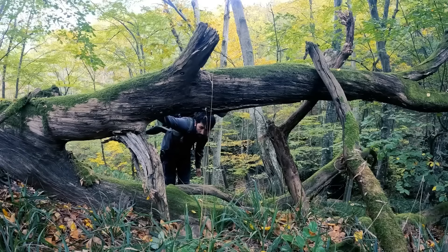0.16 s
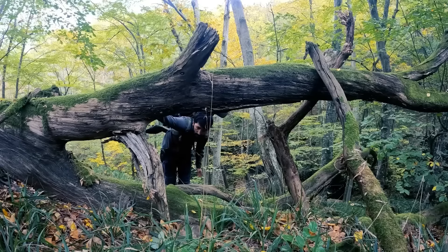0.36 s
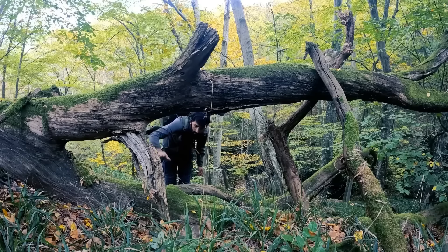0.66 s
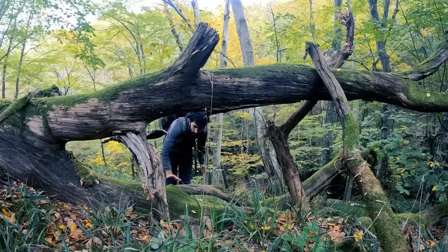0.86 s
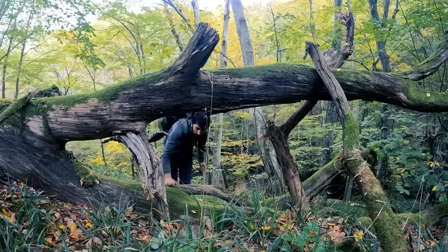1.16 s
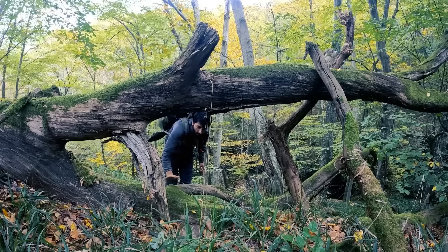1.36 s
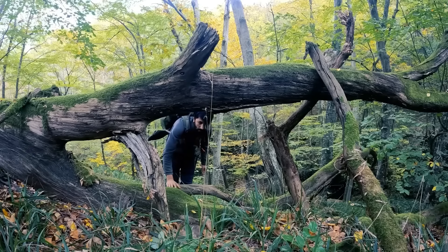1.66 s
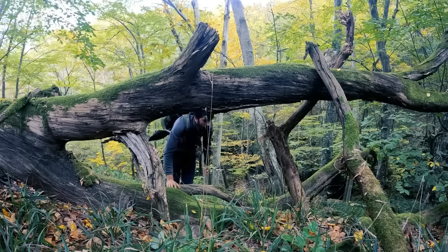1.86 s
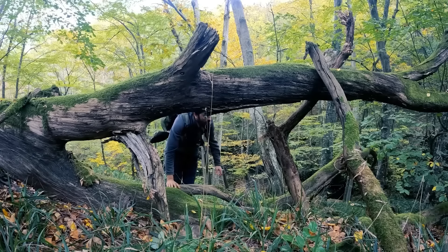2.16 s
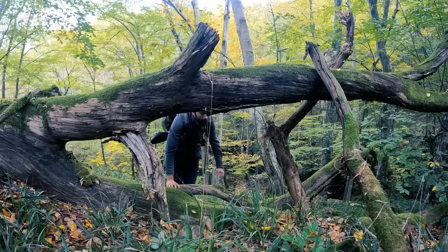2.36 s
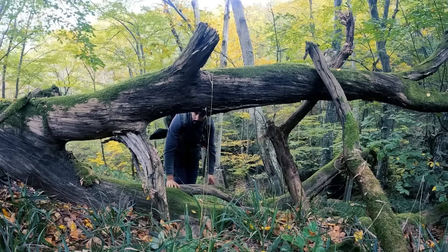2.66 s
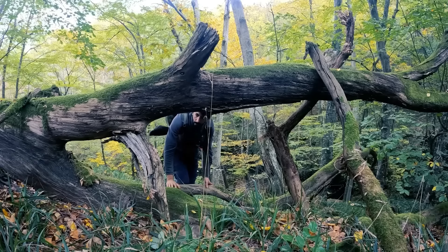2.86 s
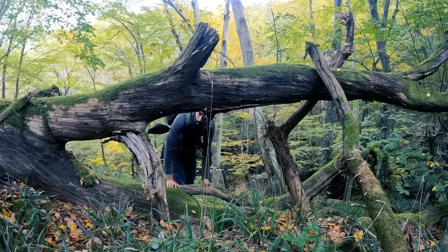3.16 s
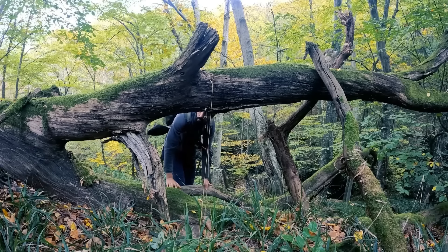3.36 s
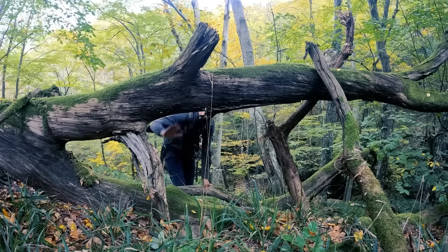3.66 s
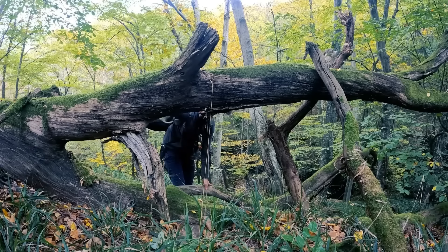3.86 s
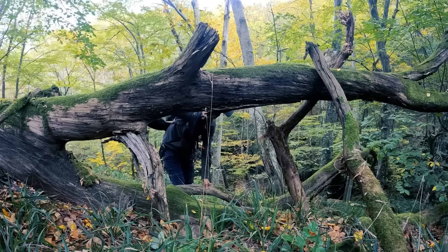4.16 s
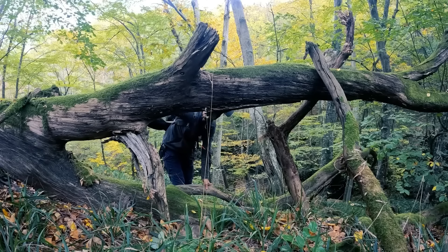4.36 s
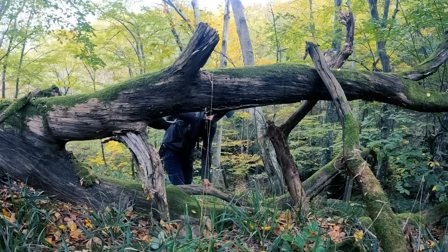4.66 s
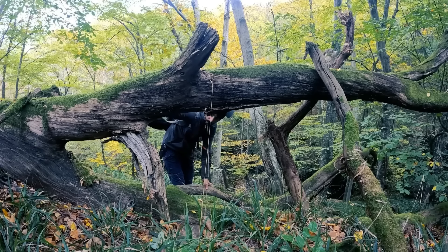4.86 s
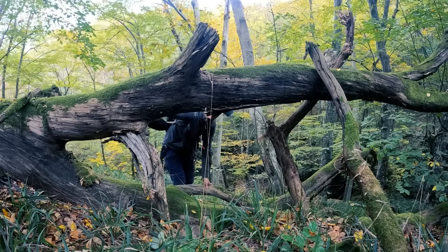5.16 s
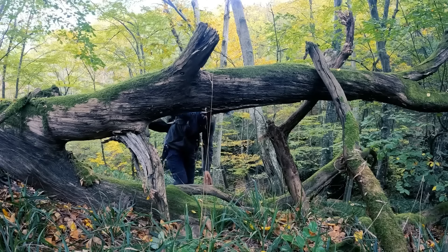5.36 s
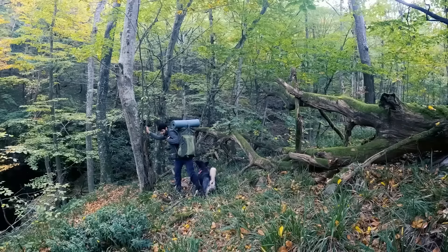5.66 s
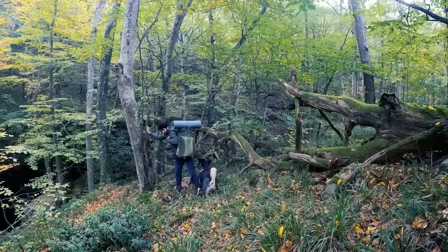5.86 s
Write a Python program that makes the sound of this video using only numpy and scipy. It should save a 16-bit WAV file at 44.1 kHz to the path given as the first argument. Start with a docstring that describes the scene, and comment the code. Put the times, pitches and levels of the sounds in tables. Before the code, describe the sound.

Over a very soft hush of foliage and a faint low murmur come three quick knocks on a log, then rustling leaves, soft footfalls and snapping twigs. Four evenly spaced hand thumps strike a large trunk, hollow and barky with low, quickly fading timber resonance. Finally leaves crunch and small twigs tick as he walks away. Outdoor stereo, close and dry with short woodland tails.

```python
"""In a quiet wood, a hiker slaps a low log three times, then thumps a big fallen trunk four times.
Each blow is a short clack of bark, made by impulses and noise through resonances, then the dull ring
of the timber, a sum of delayed decaying modes; noise tails stand for the trees that scatter the clack.
Around the blows he shifts in dry leaves and twigs snap, then he walks off, as shaped bursts of noise,
over a hush of foliage and a low murmur, both of filtered noise."""
import sys
import numpy as np
from scipy import signal
from scipy.fft import rfft, irfft, next_fast_len
from scipy.io import wavfile
from scipy.ndimage import uniform_filter1d, map_coordinates

SR = 44100
rng = np.random.default_rng(int(sys.argv[2]) if len(sys.argv) > 2 else 0)


def generate_wav(sig):
    """Save sig (samples, or channels by samples) to the path in sys.argv[1] as 16-bit PCM at SR."""
    pcm = np.round(np.clip(np.atleast_2d(sig).T, -1, 1) * 32767).astype(np.int16)
    wavfile.write(sys.argv[1], SR, pcm)


N = 264600  # samples: six seconds


def amp(db):
    """Logarithmic level: decibels become a pressure gain."""
    return 10 ** (np.asarray(db) / 20)


def unit(x):
    """Normalisation: a signal scaled to rms 1."""
    return x / np.sqrt(np.mean(x ** 2) + 1e-20)


def along(points, hz):
    """Logarithmic pitch scale: interpolates (frequency, value) points on a log axis."""
    f, v = np.transpose(points)
    return np.interp(np.log(hz + 1), np.log(f + 1), v)


def wobble(rate_hz):
    """Slow fluctuation: a smooth random curve with rate_hz knots a second."""
    knots = rng.standard_normal(int(N * rate_hz / SR) + 4)
    return map_coordinates(knots, [np.arange(N) * rate_hz / SR])


def filtered(x, response):
    """Linear filtering: the spectrum is multiplied by a complex response of frequency."""
    n = x.shape[-1]
    m = next_fast_len(n + SR // 4)
    hz = np.fft.rfftfreq(m, 1 / SR)
    return irfft(rfft(x, m) * response(hz), m)[..., :n]


def bell(hz, centre_hz, octaves):
    """Band limitation: a Gaussian pass band on the octave scale."""
    return np.exp(-.5 * (np.log2((hz + 1) / centre_hz) / octaves) ** 2)


def resonance(hz, centre_hz, width_hz):
    """Damped resonance: the complex response of one mode, 1 at its centre."""
    damping = 1j * hz * width_hz
    return damping / (centre_hz ** 2 - hz ** 2 + damping)


def event_time():
    """Causal time base: the axis of one event in seconds, with a short run-up before zero."""
    return np.arange(-SR // 50, SR * 3 // 4) / SR


def add(track, start_s, sound):
    """Superposition: mixes an event into a track with its zero at start_s."""
    start = round((start_s + event_time()[0]) * SR)
    part = sound[..., :N - start]
    track[..., start:start + part.shape[-1]] += part


def burst(t, rise, t60):
    """Exponential growth and decay: 60 dB up in rise seconds to time zero, 60 dB down in t60."""
    return amp(-60 * np.maximum(-t / rise, t / t60))


def swells(moves, attack_s, release_s):
    """Energy summation: (start_s, level_db, hold_s) swells combine as the root of summed squares."""
    t = np.arange(N) / SR
    gains = []
    for start_s, level_db, hold_s in moves:
        outside_hold = t - np.clip(t, start_s, start_s + hold_s)
        gains.append(amp(level_db) * burst(outside_hold, attack_s, release_s))
    return np.linalg.norm(gains, axis=0)


# Interchannel correlation of diffuse sound: pitch_hz, left_right_likeness (1 = identical)
DIFFUSE_CORRELATION = [(60, 1), (150, 0.18), (380, 0.52), (950, 0.81), (2380, 0.51), (5980, 0.74),
                       (15000, 0.14)]


def rush(spectrum, patchy_db):
    """Diffuse field: partly correlated stereo noise of rms 1 with patches of random gain."""
    z = signal.stft(rng.standard_normal((2, N)), nperseg=512)[2]
    field = uniform_filter1d(rng.standard_normal(z.shape[1:]), size=6, axis=0)
    field = uniform_filter1d(field, size=14, axis=1)
    pair = signal.istft(z * amp(patchy_db * unit(field)), nperseg=512)[1][:, :N]

    def mid_side_response(hz):
        # this angle between mid and side gives the wanted correlation
        angle = np.arccos(np.clip(along(DIFFUSE_CORRELATION, hz), -1, 1)) / 2
        return amp(along(spectrum, hz)) * [np.cos(angle), np.sin(angle)]

    mid, side = filtered(pair, mid_side_response)
    return unit(np.array([mid + side, mid - side]))


# Spectrum of the far foliage: pitch_hz, relative_level_db (per Hz)
FOLIAGE_SPECTRUM = [(410, -25.5), (700, -18), (806, -11.5), (1020, -1.5), (1100, -2), (1230, 0.5),
                    (1630, -1), (1810, -1.5), (4210, -5), (5310, -12.5), (5810, -8.5), (7220, -5),
                    (10200, -20), (12100, -18.5), (15000, -45)]
# Spectrum of the low murmur of the valley: pitch_hz, relative_level_db (per Hz)
MURMUR_SPECTRUM = [(12, -45), (20, -6), (65, -9), (84, -10), (108, -31), (140, -2), (185, -2.5), (229, -3),
                   (370, -12.5), (718, -11), (800, -13), (1040, -23), (1760, -120)]


def background():
    """Broadband noise: a gently wavering hush of foliage lies over faint low air noise."""
    hush = amp(-56 + 1.32 * wobble(2.58)) * rush(FOLIAGE_SPECTRUM, patchy_db=0.5)
    murmur = amp(-66 + .5 * wobble(4)) * rush(MURMUR_SPECTRUM, patchy_db=.8)
    return hush + murmur


# Spectrum of the rustling leaves: pitch_hz, relative_level_db (per Hz)
LEAF_SPECTRUM = [(300, -10.5), (700, -6.5), (1300, 0), (3000, -1.5), (5000, -8), (7000, -2), (9000, -11.5),
                 (12500, -16), (15000, -32)]
# Gentler rustles of the leaves, the last four being strides as he walks off: start_s, level_db, hold_s
LEAF_RUSTLES = [(.45, -60, 1.0), (2.35, -62.5, 1.58), (5.28, -57.5, .2), (5.57, -49.5, .11),
                (5.83, -51.5, 0.018), (5.95, -51, .06)]
# Footsteps on the spot, also played by soil(): start_s, leaves_level_db, soil_level_db
FOOTSTEPS = [(2.72, -55, -64), (3.06, -47.5, -49.5), (3.23, -49.5, -59), (3.41, -60, -66.5)]
STEP_ATTACK_S, STEP_HOLD_S, STEP_RELEASE_S = 0.26, 0.029, 0.22


def leaves():
    """Granular friction: steps, gentler rustles and strides sound the dry leaves in random clumps."""
    steps = [(start_s, level_db, STEP_HOLD_S) for start_s, level_db, _ in FOOTSTEPS]
    crunch = swells(steps, STEP_ATTACK_S, STEP_RELEASE_S)
    rustle = swells(LEAF_RUSTLES, attack_s=0.79, release_s=0.93)
    clumps = unit(amp(1.23 * wobble(250) + 1.45 * wobble(35)))
    left_right = amp([[.6], [-.6]])
    return np.hypot(crunch, rustle) * clumps * rush(LEAF_SPECTRUM, patchy_db=0.6) * left_right


def ring(t, modes):
    """Modal superposition: slow bending waves set the modes of a stem ringing one after another."""
    hz, db, t60, delay = np.transpose(modes)[:, :, None]
    age = np.maximum(t - delay, 0)
    # each blow excites every mode a little differently
    level = db + rng.normal(0, 0.69, hz.shape) - 60 * age / t60
    onset = 1 - np.exp(-age * hz)
    return np.sum(amp(level) * np.sin(2 * np.pi * hz * age) * onset, axis=0)


def bending_wave(t, start_hz, spread_s, db, t60):
    """Dispersion: high notes outrun low ones along the stem, so the returning wave glides down."""
    age = np.maximum(t, 0)
    hz = start_hz / (1 + age / spread_s) ** 2
    envelope = amp(db - 60 * age / t60) * (1 - np.exp(-age / 0.012))
    return envelope * np.sin(2 * np.pi * np.cumsum(hz) / SR)


# Resonances of the wood around the struck spot: pitch_hz, width_hz, relative_level_db
BARK_RESONANCES = [(975, 112, 1.5), (1403, 156, 1.5), (1683, 137, 4), (2180, 187, 3), (2750, 310, -0.5),
                   (3670, 240, 2.5), (4130, 150, -7)]
# Spectrum of the cracking dry flakes: pitch_hz, relative_level_db (per Hz)
CRACK_SPECTRUM = [(1500, -25), (2600, -26), (3600, 0), (4700, -5), (6100, -7), (6800, -8.5), (8500, -15),
                  (12500, -23), (14500, -40)]


def contact(t, pop_db, pop_hz, clack_db, corner_hz, crack_db, crush_t60):
    """Impact excitation: a push amid crushing bark pops hand air, clacks wood and cracks flakes."""
    crush = rng.standard_normal(len(t)) * burst(t, rise=0.013, t60=crush_t60)
    crush /= np.linalg.norm(crush)
    # the heel of the hand lands first, the fingers a moment later
    heel = signal.unit_impulse(len(t), np.argmin(abs(t)))
    fingers = amp(-5.5) * signal.unit_impulse(len(t), np.argmin(abs(t - .0016)))
    push = heel + fingers

    def hollow(f):
        return resonance(f, pop_hz, 0.76 * pop_hz) ** 2

    def soft_wood(f):
        # neighbouring modes alternate in sign
        wood = sum((-1) ** k * amp(db) * resonance(f, hz, width)
                   for k, (hz, width, db) in enumerate(BARK_RESONANCES))
        return wood / np.sqrt(1 + (f / corner_hz) ** 10)

    pop = filtered(amp(-3) * push + amp(-9.5) * crush, hollow)
    clack = filtered(amp(-5.5) * push + amp(-1.5) * crush, soft_wood)
    crack = filtered(amp(-3) * push + amp(-2) * crush, lambda f: amp(along(CRACK_SPECTRUM, f)))
    return amp(pop_db) * pop + amp(clack_db) * clack + amp(crack_db) * crack


# Decay of the scatter among near stems: pitch_hz, t60_s
NEAR_DECAY = [(200, 0.37), (600, 0.13), (1500, 0.042), (4000, 0.15), (10000, 0.18)]


def forest(x, near_db, far_db, far_t60, echo_db, echo_s, echo_hz, width):
    """Scattering: near stems give a short tail, far ones a faint long one, a bank one blurred echo."""
    hz, t, z = signal.stft(rng.standard_normal((2, SR * 3 // 4)), SR, nperseg=256)
    hz = hz[:, None]
    near = amp(-60 * t / along(NEAR_DECAY, hz)) * (1 - np.exp(-t / 0.0033))
    far = amp(-60 * t / far_t60) * bell(hz, 1970, 4.7)
    echo = np.exp(-.5 * ((t - echo_s) / 0.0045) ** 2) * bell(hz, echo_hz, 0.1)
    mid, side = 0, 0
    for shape, db in ((near, near_db), (far, far_db), (echo, echo_db)):
        tail = signal.istft(z * shape, SR, nperseg=256)[1]
        tail = amp(db) * tail / np.linalg.norm(tail[0])
        mid, side = mid + tail[0], side + tail[1]
    pair = np.array([mid + width * side, mid - width * side])
    return signal.fftconvolve(x[None], pair, axes=1)[:, :N]


# Phase between the two microphone ports: pitch_hz, left_lead_rad
PORT_LEAD = [(30, 0.11), (60, 0.44), (130, 0.14), (500, 0.35), (1500, -0.6), (5000, 0.75), (12000, 0.8)]


def knocks(blows, modes, glide, wet_db):
    """Direct and scattered sound: timber and contact arrive directly, the contact also by the trees."""
    direct, scatter, t = np.zeros(N), np.zeros((2, N)), event_time()
    for start_s, ring_db, *touch in blows:
        clack = contact(t, *touch)
        timber = amp(ring_db) * (ring(t, modes) + glide)
        add(direct, start_s, clack + timber)
        tail = forest(clack, near_db=-10.0, far_db=-20.5, far_t60=0.45,
                      echo_db=-36, echo_s=0.091, echo_hz=1070, width=0.4)
        add(scatter, start_s, tail)
    half_each = np.array([[.5], [-.5]])
    ports = filtered(direct, lambda f: np.exp(1j * along(PORT_LEAD, f) * half_each))
    stems = ports + amp(wet_db) * scatter
    return stems * amp([[.2], [-.2]])


# Modes of the log: pitch_hz, relative_level_db, t60_s, buildup_delay_s
LOG_MODES = [(46, -50, .4, .004), (64.7, -41.4, .27, .007), (80.9, -39.5, .45, .0055),
             (110.6, -31.8, .21, .003), (133.7, -49.3, .38, .0085), (157, -18, .044, .0072),
             (164.7, -25, .11, 0), (225, -39.4, .23, .007), (247, -33, .08, .005), (350, -46, .13, .005)]
# Slaps: start_s, ring_level_db, hand_pop_level_db, pop_pitch_hz, clack_level_db, clack_corner_hz,
# crack_level_db, crush_t60_s (all levels relative)
LOG_SLAPS = [(1.1012, -8.5, -9.5, 485, -13, 1700, -40, 0.01),
             (1.3652, -0.5, 9.5, 516, -0.5, 3450, -8.5, 0.016),
             (1.5902, .5, 3.5, 500, 3.5, 2050, -18.5, 0.0095)]


def log_slaps():
    """Struck bar: the modes of the low log ring after each slap."""
    glide = bending_wave(event_time(), start_hz=478, spread_s=0.15, db=-48, t60=0.46)
    return knocks(LOG_SLAPS, LOG_MODES, glide, wet_db=-2.0)


# Twigs and leaves: start_s, level_db, centre_pitch_hz, width_octaves, t60_s, left_over_right_db
TWIG_SNAPS = [(1.261, -43.5, 3600, 0.97, .02, 2), (2.307, -53.5, 12400, 0.45, 0.05, 23),
              (2.357, -55, 12000, 0.77, 0.065, 16), (2.715, -39.5, 12100, 0.68, 0.058, 16.5),
              (3.088, -32.5, 2440, 0.9, 0.034, -2), (3.226, -43.5, 2380, 0.93, 0.05, -1),
              (5.504, -55, 9500, 0.4, .04, 8), (5.670, -36.5, 3650, 0.41, 0.0072, 2),
              (5.756, -46, 7000, 0.39, 0.036, 1), (5.850, -37.5, 5550, 0.58, 0.01, 0)]


def twigs():
    """Brittle fracture: dry twigs snap and leaves flick as noise bursts, some far to the left."""
    track, t = np.zeros((2, N)), event_time()
    for start_s, level_db, centre_hz, octaves, t60, pan_db in TWIG_SNAPS:
        noise = rng.standard_normal((2, len(t)))
        mid, side = unit(filtered(noise, lambda f: bell(f, centre_hz, octaves)))
        side = amp(-9.5) * side
        pair = np.array([mid + side, mid - side]) * amp([[pan_db / 2], [-pan_db / 2]])
        add(track, start_s, amp(level_db) * pair * burst(t - .001, rise=0.0062, t60=t60))
    return track


# Spectrum of the sleeve: pitch_hz, relative_level_db (per Hz)
CLOTH_SPECTRUM = [(2000, -31), (3800, -3.5), (4700, -3), (7000, 4.5), (9000, -5.5), (12500, -7),
                  (15000, -29)]
# Strokes of the sleeve along the bark: start_s, level_db, hold_s
SLEEVE_STROKES = [(2.35, -57.5, 0.043), (2.68, -57, .37), (2.73, -47, 0.042), (3.06, -54, 0.037)]


def sleeve():
    """Sliding friction: a sleeve brushes the bark as patchy noise, stronger on the left."""
    brush = swells(SLEEVE_STROKES, attack_s=.13, release_s=0.37)
    return brush * rush(CLOTH_SPECTRUM, patchy_db=4.0) * amp([[2.5], [-2.5]])


# Spectrum of the soft soil: pitch_hz, relative_level_db (per Hz)
SOIL_SPECTRUM = [(40, -11), (110, -12.5), (170, 8.5), (260, 0), (480, -8), (900, -24), (3000, -70)]
SINK_S = 0.017  # the sole meets the leaves first and the soil this much later


def soil():
    """Damped compression: the feet press the soft soil into low, patchy noise."""
    steps = [(start_s + SINK_S, level_db, STEP_HOLD_S) for start_s, _, level_db in FOOTSTEPS]
    weight = swells(steps, STEP_ATTACK_S, STEP_RELEASE_S)
    return weight * rush(SOIL_SPECTRUM, patchy_db=2.5)


# Modes of the trunk: pitch_hz, relative_level_db, t60_s, buildup_delay_s
TRUNK_MODES = [(36.5, -42, .42, .003), (48, -45, .45, .016), (53.9, -38, .53, .013), (63.1, -30, .52, 0),
               (77.8, -35.8, .58, .0046), (85.4, -41.9, .59, .0175), (96.7, -23.4, .056, .014),
               (115.9, -27.4, .32, .012), (130.5, -32, .23, .0116), (149, -26, .27, .0105),
               (167.7, -18.2, .09, .016), (194, -36.6, .28, .014), (208, -20, .04, 0),
               (240, -36, .12, .0155), (267, -20, .04, 0), (331, -39, .12, .0133)]
# Thumps: start_s, ring_level_db, hand_pop_level_db, pop_pitch_hz, clack_level_db, clack_corner_hz,
# crack_level_db, crush_t60_s (all levels relative)
TRUNK_THUMPS = [(4.0724, 1.5, 12.5, 500, 6.5, 2600, -9, 0.021),
                (4.4232, 0, 4.1, 443, -1.5, 2350, -12, 0.011), (4.7333, -3, 18.6, 570, 6, 4770, -1, 0.024),
                (5.1012, -3.5, 17.7, 617, 12, 2320, 4.5, 0.022)]


def trunk_thumps():
    """Struck bar: the modes of the big trunk, more and reaching lower, ring after each thump."""
    glide = bending_wave(event_time(), start_hz=523.4, spread_s=.115, db=-45.0, t60=0.57)
    return knocks(TRUNK_THUMPS, TRUNK_MODES, glide, wet_db=1.5)


def scene():
    """Superposition: both stems, almost straight ahead, and the hiker's movements add to the hush."""
    hiker = leaves() + twigs() + sleeve() + soil()
    return background() + hiker + log_slaps() + trunk_thumps()


def record(dry):
    """Band limitation: the microphone loses the deepest bass and rolls off steeply at the top."""
    thinned = signal.sosfilt(signal.butter(2, 22, "highpass", fs=SR, output="sos"), dry)
    return filtered(thinned, lambda hz: 1 / (1 + (hz / 14800) ** 50))


dry = scene()
out = record(dry)
generate_wav(out)
```